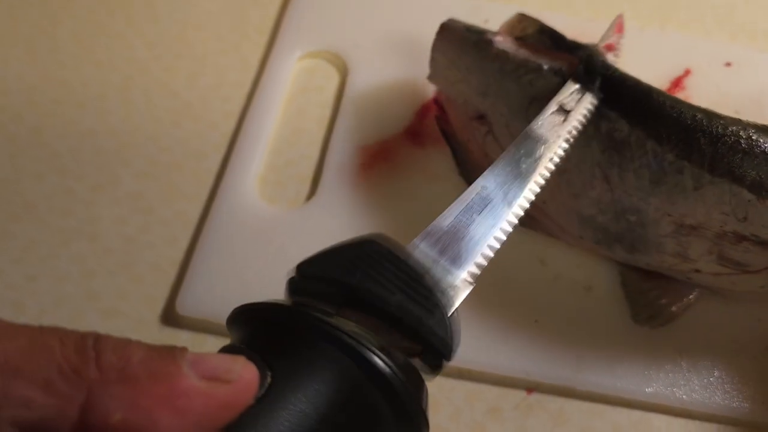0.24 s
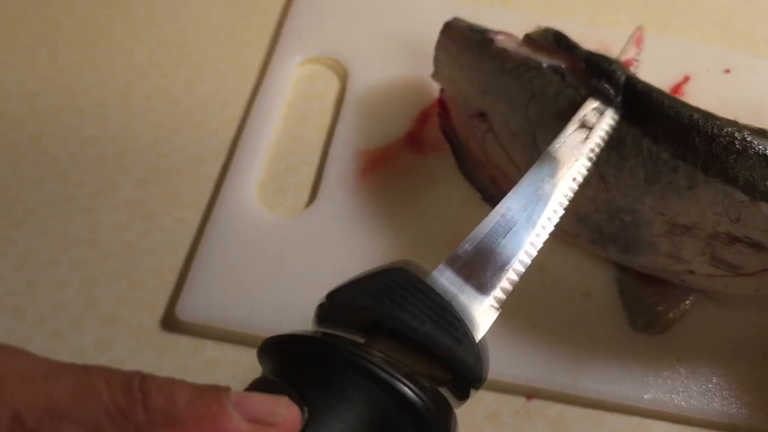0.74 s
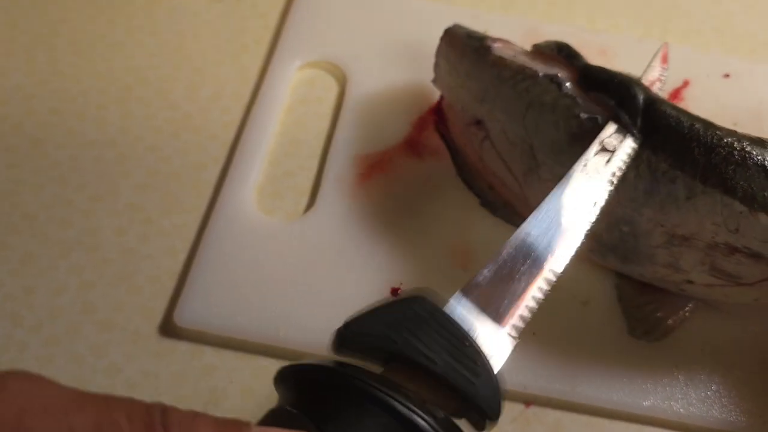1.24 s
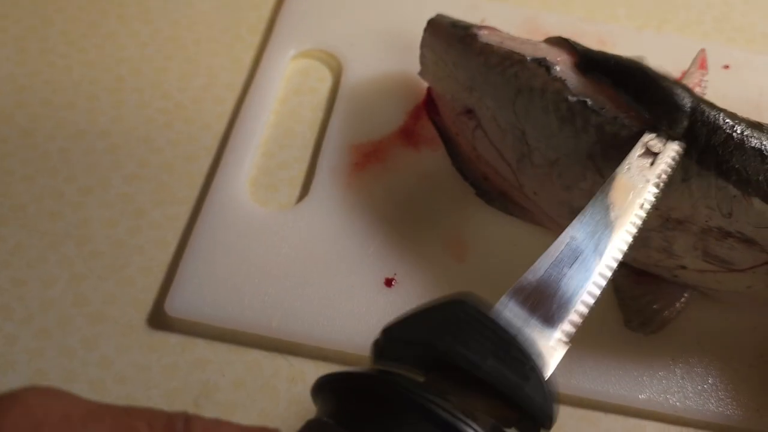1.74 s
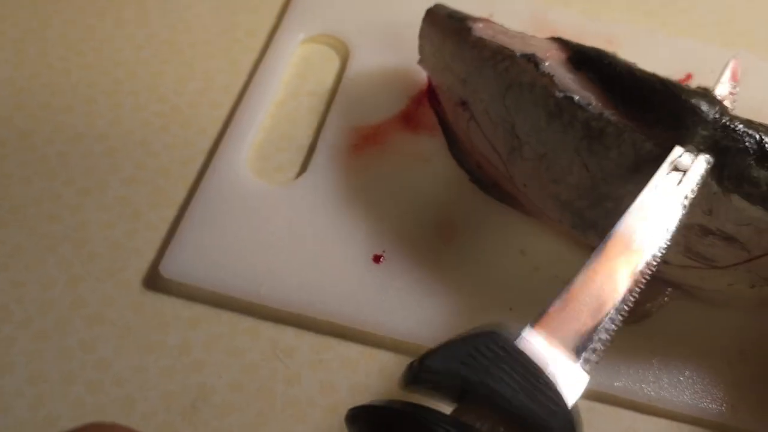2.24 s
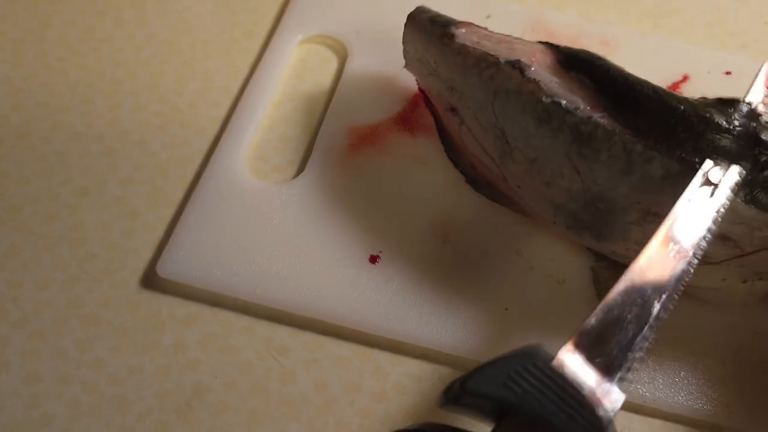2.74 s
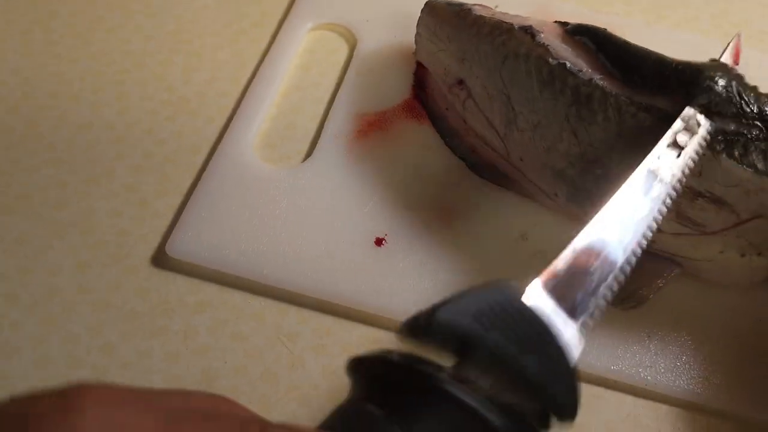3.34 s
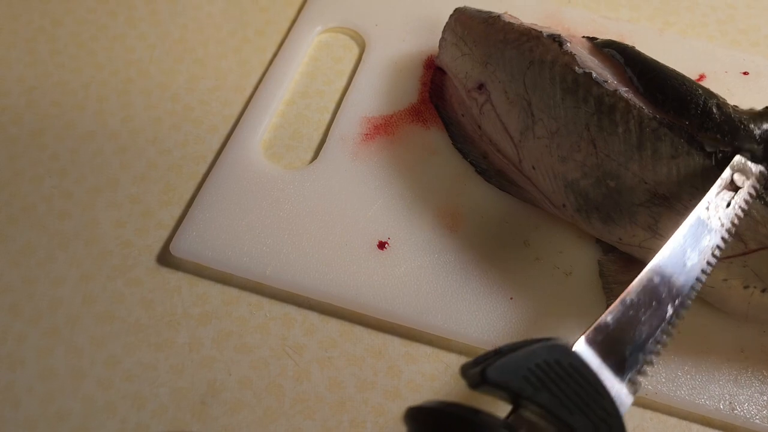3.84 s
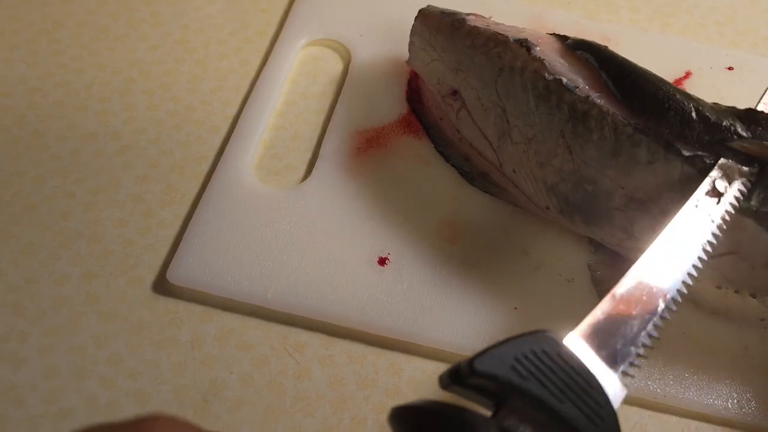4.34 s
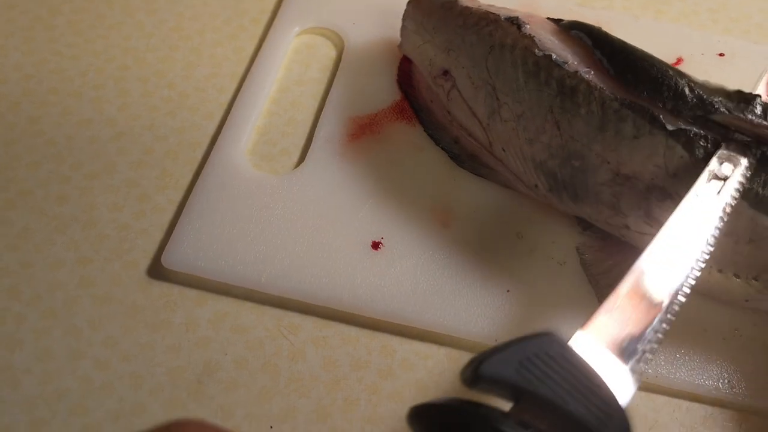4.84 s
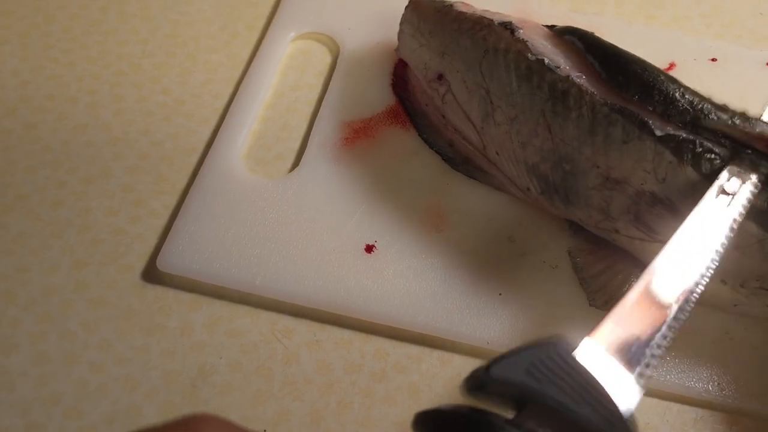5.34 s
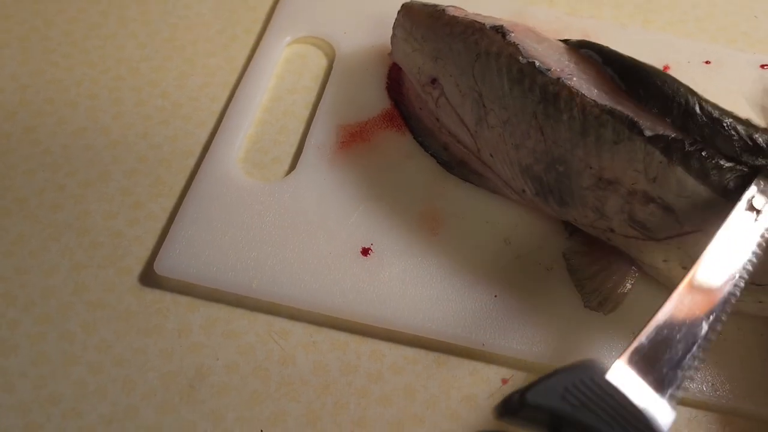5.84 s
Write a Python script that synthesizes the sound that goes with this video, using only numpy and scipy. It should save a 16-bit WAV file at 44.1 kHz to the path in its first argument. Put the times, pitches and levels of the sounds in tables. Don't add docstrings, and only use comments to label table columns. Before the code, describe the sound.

In a small kitchen, an electric fillet knife buzzes harshly close to the microphone, its blades clacking rapidly over gritty gears. The buzz thickens as it presses into the fish. Just past halfway the motor is released and slows with loose metallic clacks. A brief near-silence holds wet ticks and a light tap on the board, then the motor snaps back on and saws to the end.

```python
import sys
import numpy as np
from scipy import signal
from scipy.fft import rfft, irfft
from scipy.io import wavfile
from scipy.ndimage import uniform_filter1d

SR = 44100
rng = np.random.default_rng(int(sys.argv[2]) if len(sys.argv) > 2 else 0)


def decibels_to_gain(level_db):
    exponent = np.asarray(level_db, float) / 20
    return 10 ** exponent


def wav_record(signal):
    frames = np.transpose(np.atleast_2d(signal))
    bounded = np.clip(frames, -1, 1)
    quanta = np.round(bounded * 32767).astype(np.int16)
    wavfile.write(sys.argv[1], SR, quanta)


N = 269451
TIME = np.arange(N) / SR
RELEASE_S, RESTART_S = 3.36, 4.645


def evened(x):
    return x / np.sqrt(np.mean(x ** 2) + 1e-20)


def read(points, hz):
    f, value = np.transpose(points)
    return np.interp(np.log(hz + 1), np.log(f + 1), value)


def curves(rows):
    s, *rest = np.transpose(rows)
    return [np.interp(TIME, s, column) for column in rest]


def resonate(x, hz, width):
    r = np.exp(-np.pi * width / SR)
    pole = r * np.exp(2j * np.pi * hz / SR)
    return 2 * signal.lfilter([1 - r], [1, -pole], x).real


# start_s, speed_strokes_per_s
POWERED_SPEED = [(0, 37.0), (.3, 37.15), (.9, 37.08), (1.2, 36.84), (1.5, 36.52), (1.85, 37.11),
                 (2.3, 37.1), (2.6, 36.66), (2.9, 36.39), (3.1, 36.55), (3.36, 36.4), (4.8, 36.7), (5, 37),
                 (5.25, 36.7), (5.45, 36.35), (5.7, 36.24), (5.9, 35.99), (6.11, 35.7)]


def rotor():
    start_speed, friction, drag_s, spin_up_s = 34.5, 31, 1.3, .03
    held = curves(POWERED_SPEED)[0]
    coast = (start_speed + friction) * np.exp(-(TIME - RELEASE_S) / drag_s) - friction
    coast = np.maximum(coast, 0)
    spin = 1 - np.exp(-np.maximum(TIME - RESTART_S, 0) / spin_up_s)
    running_again = np.where(TIME < RESTART_S, coast, held * spin)
    return np.where(TIME < RELEASE_S, held, running_again)


# start_s, angle_turns
START_ANGLES = [
    (0, .13),
    (4.8, .9),
]


def stroke(speed):
    turns = np.cumsum(speed) / SR + START_ANGLES[0][1]
    s, angle = START_ANGLES[1]
    return turns + (TIME > RESTART_S) * ((angle - turns[round(s * SR)]) % 1)


# start_s, full_speed_grind_db, pressure_as_board_shake_db
HAND = [(0, -28, -45), (.5, -28.5, -45), (.73, -29, -45.5), (.85, -28.5, -44.5), (1.42, -28, -41),
        (1.6, -27.5, -48), (1.9, -28, -46), (2.05, -26.5, -53), (2.21, -27, -41.5), (2.59, -29, -35.5),
        (3.2, -28.5, -33), (3.33, -27, -40.5), (4.75, -27.5, -35), (4.98, -27.5, -39.5),
        (5.16, -28.5, -31.5), (5.39, -29, -34), (5.8, -28, -35.5), (6.0, -28, -33.5)]


def effort(speed):
    coast_db, spin_db = 33.5, 25
    grind_db, press_db = curves(HAND)
    free = (TIME > RELEASE_S) & (TIME < RESTART_S)
    share = np.minimum(speed / 36.5 + 1e-3, 1)
    grind_db = grind_db + np.where(free, coast_db, spin_db) * np.log10(share)
    grind_db = np.maximum(grind_db, -90)
    grind_db += -2 * uniform_filter1d(1. * free, 3000) * (TIME < RESTART_S)
    pressed = np.where(free, 0, (press_db + 52) / 14)
    boom_db = -9 + 2.74 * pressed + 9.5 * (1 - share) ** 1.2
    shake_db = uniform_filter1d(np.where(free, -69, press_db), 3000)
    shake_db += -16 * (TIME > RESTART_S) * np.exp(-abs(TIME - RESTART_S) / 0.35)
    load = 0.55 + 0.13 * pressed + 0.32 * (1 - share)
    return grind_db, boom_db, shake_db, load


# start_s, peak_db
LOOSE_CLACKS = [(3.59, -25), (3.682, -20.5), (3.7338, -27.5), (3.7604, -32), (3.792, -23), (3.8638, -31),
                (3.913, -31), (3.952, -35), (4.061, -38), (4.125, -37.5), (4.646, -35.5)]


def reversals(turns, grind_db):
    even = (TIME < 3.556) | (TIME > 4.675)
    loose = uniform_filter1d(1. * (TIME > 1.45) * (TIME < 2.35), 9000)
    slap = np.where(TIME < RESTART_S, 0.3, 0.24) + 0.3 * loose
    hard, soft = np.ones(N), np.full(N, .88)
    clicks = np.zeros(N + 400)
    for angle, size in [(0, hard), (.5, soft), (.27, slap), (.76, .4 * slap)]:
        at = np.flatnonzero(np.diff(np.floor(turns - angle)) * even[1:])
        luck = rng.uniform(-1, 1, (len(at), 2))
        shifted = at + (30 * luck[:, 0]).astype(int)
        clicks[np.maximum(shifted, 0)] += size[at] * decibels_to_gain(2.2 * luck[:, 1])
    clicks[round(RELEASE_S * SR):round(RESTART_S * SR)] *= 1.4
    for s, db in LOOSE_CLACKS:
        size = decibels_to_gain(db - grind_db[round(s * SR)] - 14.5)
        clicks[round(s * SR)] += size
        clicks[round((s + .005) * SR)] += .7 * size
    return clicks[:N]


def rattle(clicks):
    t = np.arange(500) / SR
    chatter = t / .0013 * np.exp(1 - t / .0013)
    burst = signal.oaconvolve(clicks, chatter)[:N]
    grain_db = 2.4 * np.minimum(rng.exponential(1, N), 4)
    grains = (rng.random(N) < 1500 / SR) * decibels_to_gain(grain_db)
    grit = evened(1.5 + signal.oaconvolve(grains, np.exp(-t / .0006))[:N])
    return (grit + 1.65 * burst) * rng.standard_normal((2, N))


# pitch_hz, density_db_per_hz
FREE_COLOUR = [(76, -32), (130, -3), (179, -15.5), (297, -1.5), (335, -6.5), (810, -7), (952, -1),
               (1140, -7.5), (1890, 1.5), (3380, -12), (7400, 3), (15900, -17)]
# pitch_hz, density_db_per_hz
LOADED_COLOUR = [(76, -37.5), (130, 4), (179, -21), (291, 1.5), (335, -10), (553, -2.5), (763, -10),
                 (1310, -2.5), (2350, -5.5), (3120, -3), (14100, -14.5), (15900, -26.5)]
# pitch_hz, width_hz, lift_db
BODY_MODES = [(300, 51, -13), (567, 1170, 6), (986, 78, 11), (1320, 120, 7), (1564, 100, 6),
              (1901, 32, 7.5), (2970, 470, 2), (2100, 240, 2.5), (4350, 350, 2.5), (6600, 500, -2.5),
              (9220, 800, 4.5), (10170, 900, -4), (11490, 200, 9), (11460, 1120, -1), (14700, 930, 8.5)]


def housing(excite, boom_db, load):
    hz, t, z = signal.stft(excite, SR, nperseg=512, noverlap=384)
    boom_db = np.interp(t, TIME, boom_db)
    load = np.clip(np.interp(t, TIME, load), -.3, 1.3)
    db = np.outer(read(FREE_COLOUR, hz), 1 - load) + np.outer(read(LOADED_COLOUR, hz), load)
    for f, width, lift in BODY_MODES:
        db += (lift / (1 + ((hz - f) / width * 2) ** 2))[:, None]
    drift = uniform_filter1d(rng.standard_normal(db.shape), 5, 0)
    drift = uniform_filter1d(drift, 90, 1)
    shape = decibels_to_gain(db + 0.94 * evened(drift))
    low = shape / (1 + (hz[:, None] / 1900) ** 6)
    high = shape - low
    low, high = low / np.linalg.norm(low, axis=0), high / np.linalg.norm(high, axis=0)
    return signal.istft(z * (high + decibels_to_gain(boom_db) * low), SR, nperseg=512, noverlap=384)[1][:, :N]


# start_s, length_s, fish_thump_db, board_thump_db, whine_muffled_db
BEARING_DOWN = [
    (.35, 0.56, -52, -52, 0.5),
    (1.45, .4, -39, -60, 0),
    (2.1, .8, -36, -54, 12),
    (2.5, 0.85, -32, -59, 18),
    (5.05, 0.62, -36.5, -49, 3.5),
    (5.404, 0.69, -43, -40.5, 2),
    (5.85, 0.77, -53, -52, -5),
]


def bearing(speed):
    on = ((TIME < RELEASE_S) | (TIME > RESTART_S)) * (speed / speed.max()) ** 4
    fish, board, muffle_db = decibels_to_gain(-54), decibels_to_gain(-61.5), 0
    for s, length, fish_db, board_db, lost_db in BEARING_DOWN:
        swell = np.sin(np.pi * np.clip((TIME - s) / length, 0, 1)) ** 2
        fish = fish + swell * decibels_to_gain(fish_db)
        board = board + swell * decibels_to_gain(board_db)
        muffle_db = muffle_db + swell * lost_db
    fast, slow = 12.8, 4.3
    sings = uniform_filter1d(1. * (speed < fast) * (speed > slow) * (TIME < RESTART_S), 2500)
    tone = on * decibels_to_gain(-44 - muffle_db) + sings * (speed / (.7 * fast)) ** .5 * decibels_to_gain(-55.5)
    return on * fish, on * board, tone


# pitch_hz, width_hz, level_db
FLESH_MODES = [(945, 50, -6), (1215, 60, -4), (1290, 60, -5), (1355, 60, -1), (1500, 60, 0), (1575, 60, -1)]


def press(turns, fish_gain, board_gain):
    half = np.floor(2 * turns)
    push_pull = np.where(half % 2, -.7, 1)
    thumps = np.diff(half, prepend=0).clip(0, 1) * push_pull
    thumps = thumps * (1 + 0.054 * rng.standard_normal(N))
    fish = sum(decibels_to_gain(db) * resonate(thumps, hz, width) / width for hz, width, db in FLESH_MODES)
    board = resonate(thumps, 545, 40)
    return evened(fish) * fish_gain + evened(board) * board_gain


# stroke_multiple, level_db, phase_rad
SHAKE_ORDERS = [(1, -21, 0.048), (3, -12, -3.2), (4, -18, -1.7), (6, -22, -0.13), (7, -23.5, .1),
                (8, -12.5, -1.2)]


def motor(turns, grind_db, shake_db, tone):
    waver = 1 + .3 * evened(uniform_filter1d(rng.standard_normal((3, N)), 700))
    angle = 2 * np.pi * turns
    fourth = decibels_to_gain(-12) * (grind_db > -40) * np.sin(400 * angle)
    whine = np.sqrt(2) * tone * (waver[0] * np.sin(100 * angle) + fourth)
    shaft = decibels_to_gain(1.3 * grind_db - 11) * (grind_db > -50) * waver[1] * np.sin(100 / 12 * angle)
    shake = np.cos(2 * angle + 1.6) * decibels_to_gain(shake_db)
    rest_db = .5 * uniform_filter1d(shake_db, 9000) + grind_db + 11
    for order, db, phase in SHAKE_ORDERS:
        shake += waver[2] * decibels_to_gain(db + rest_db) * np.cos(round(order) * angle + phase)
    judder = evened(resonate(resonate(rng.standard_normal((2, N)), 83, 70), 83, 70))
    judder = judder[0] + 0.65 * judder[1] * [[1], [-1]]
    return whine, np.sqrt(2) * shake + shaft + decibels_to_gain(grind_db - 23) * judder


# pitch_hz, density_db_per_hz
AIR_COLOUR = [(18, -37), (30, -20.5), (90, -9.5), (174, -41), (251, -29.5), (425, -39.5), (798, -32),
              (1090, -61), (1420, -37.5), (2340, -49.5), (15900, -56.5)]
# pitch_hz, level_db
APPLIANCE_HUM = [(75, -72.5), (120, -71), (240, -74), (311, -83)]


def kitchen():
    hz = np.fft.rfftfreq(N, 1 / SR)
    air = irfft(rfft(rng.standard_normal((2, N))) * decibels_to_gain(read(AIR_COLOUR, hz)), N)
    hum = 0
    for f, db in APPLIANCE_HUM:
        hum = hum + decibels_to_gain(db) * evened(resonate(resonate(rng.standard_normal(N), f, 9), f, 9))
    return decibels_to_gain(-53.5 - 6.0) * evened(air) + hum


# pitch_hz, likeness_0_to_1
LIKENESS = [(60, 0.64), (200, 0.61), (500, 0.31), (1500, 0.61), (3000, 0.06), (15000, 0.057)]
# pitch_hz, left_over_right_db
LEFT_LEAN = [(60, 4), (180, -2.5), (550, 4.5), (1650, 3.5), (4970, 3.5), (15000, 3.5)]


def spread(one, other, lead_s=0.0002925):
    hz = np.fft.rfftfreq(N, 1 / SR)
    same = np.clip(read(LIKENESS, hz), 0, 1)
    late = np.exp(-2j * np.pi * hz * lead_s * hz ** 2 / (hz ** 2 + 500 ** 2))
    left = rfft(one)
    right = late * (same * left + np.sqrt(1 - same ** 2) * rfft(other))
    lean = decibels_to_gain(read(LEFT_LEAN, hz) / 2)
    return np.array([irfft(left * lean, N), irfft(right / lean, N)])


def walls(x, t60=0.14):
    taps = np.zeros((2, 16000))
    at = np.arange(200, 15980, 20) + rng.integers(0, 20, (2, 789))
    echoes = rng.choice([-1., 1.], at.shape) * decibels_to_gain(-60 * at / SR / t60)
    np.put_along_axis(taps, at, echoes, 1)
    return signal.oaconvolve(x, taps / np.linalg.norm(taps[0]), axes=1)[:, :N]


# pitch_hz, width_hz, level_over_grind_db
HOUSING_RING_MODES = [(660, 120, -10.5), (1380, 330, -11), (3070, 180, -17), (4540, 480, -2.5)]


def jangle(excite, grind_db):
    free = uniform_filter1d(1. * (TIME > RELEASE_S) * (TIME < RESTART_S), 4000)
    rings = sum(decibels_to_gain(db) * evened(resonate(excite, hz, width)) for hz, width, db in HOUSING_RING_MODES)
    creep = np.sin(np.pi * np.clip((TIME - 4.1) / .17, 0, 1)) * decibels_to_gain(-57)
    scrape = creep * evened(resonate(excite, 800, 1500))
    return free * decibels_to_gain(grind_db - 12) * rings + scrape


# start_s, peak_db, pitch_hz, width_hz
WET_TICKS = [
    (4.206, -55, 3050, 900),
    (4.294, -40.5, 9000, 12000),
    (4.303, -46, 3150, 1800),
    (4.33, -46, 8000, 5000),
    (4.385, -55.5, 7500, 4000),
    (4.445, -67.5, 11900, 5000),
    (4.462, -58, 4430, 900),
    (4.475, -63, 9450, 3500),
    (4.525, -62, 10900, 5000),
    (4.55, -70.5, 4000, 900),
]
# pitch_hz, width_hz, peak_db
BLADE_TAP = [
    (680, 150, -51),
    (960, 300, -39),
    (1900, 700, -51),
    (6000, 6000, -48),
]
# start_s, peak_db, pitch_hz
BOARD_BUMPS = [(3.762, -42, 70), (4.102, -38, 113), (4.123, -46, 300), (4.254, -57, 70), (4.35, -56, 75),
               (4.451, -51, 121), (4.452, -49, 283), (4.483, -53, 293), (4.542, -50, 70)]


def ticks():
    out, t = np.zeros((2, N)), np.arange(6000) / SR
    sharp = list(WET_TICKS) + [(4.4145, db, hz, width) for hz, width, db in BLADE_TAP]
    events = [(s, db, hz, width, .028 * (hz / 3000) ** -.3) for s, db, hz, width in sharp]
    events += [(s, db, hz, 65, .12) for s, db, hz in BOARD_BUMPS]
    for s, db, hz, width, t60 in events:
        ring = resonate(resonate(rng.standard_normal((2, 6000)), hz, width), hz, width)
        ring = ring * decibels_to_gain(-60 * t / t60) * np.minimum(t * hz / 2, 1)
        out[:, round(s * SR):][:, :6000] += decibels_to_gain(db) * ring / abs(ring).max(1, keepdims=True)
    return out


def scene():
    speed = rotor()
    turns = stroke(speed)
    grind_db, boom_db, shake_db, load = effort(speed)
    excite = rattle(reversals(turns, grind_db))
    grind = housing(excite, boom_db, load)
    grind = grind / np.sqrt(uniform_filter1d((grind ** 2).mean(0), 9000)) * decibels_to_gain(grind_db + 4.0)
    fish, board, tone = bearing(speed)
    thumps = press(turns, fish, board)
    whine, shake = motor(turns, grind_db, shake_db, tone)
    near = spread(*(grind + thumps + jangle(excite, grind_db) + ticks()))
    near = near + whine * decibels_to_gain([[2], [-2]])
    return near + decibels_to_gain(-11) * walls(near) + shake + spread(*kitchen(), 0)


def roll_off(x):
    return signal.sosfilt(signal.butter(12, 15980, fs=SR, output="sos"), x)


def record(dry):
    edge = signal.firwin(301, 15950, window=("kaiser", 8), fs=SR)
    mix = signal.oaconvolve(dry, edge[None], "same")
    return roll_off(mix)


dry = scene()
out = record(dry)
wav_record(out)
```